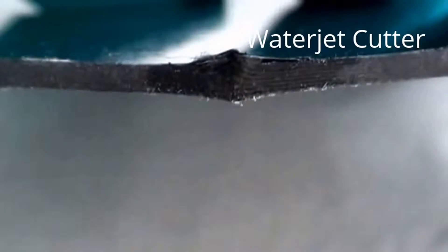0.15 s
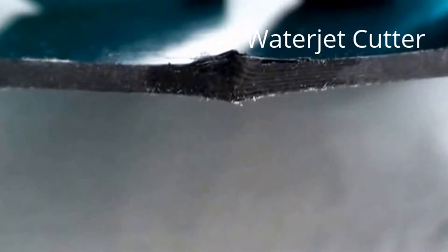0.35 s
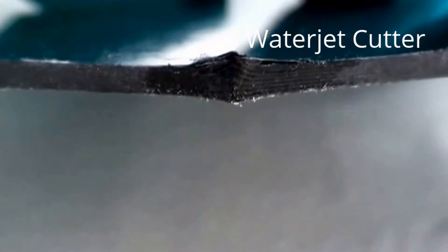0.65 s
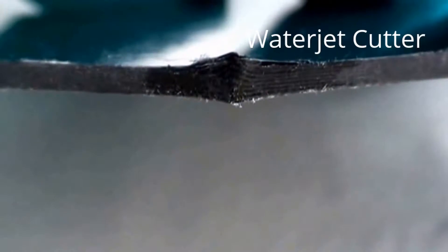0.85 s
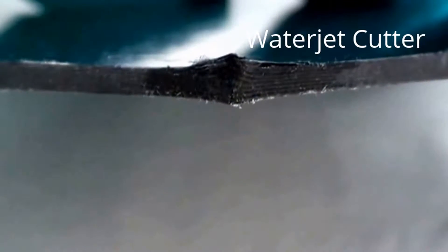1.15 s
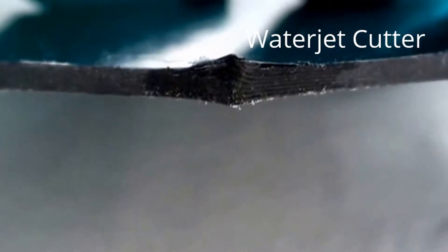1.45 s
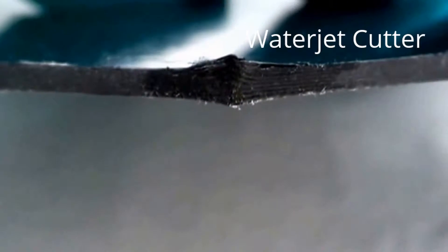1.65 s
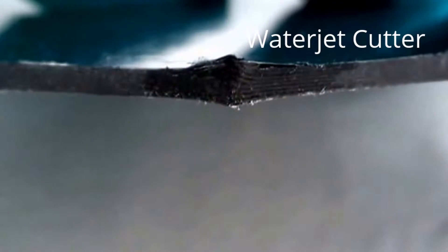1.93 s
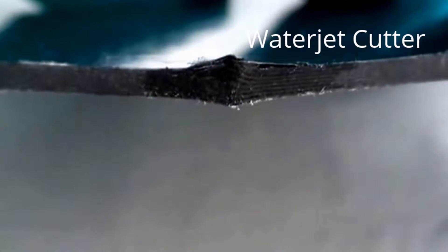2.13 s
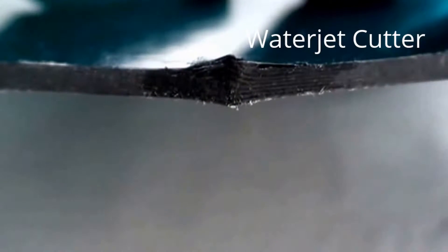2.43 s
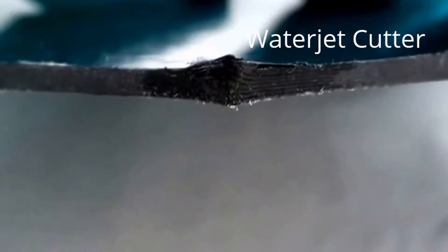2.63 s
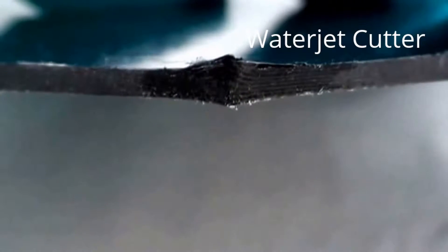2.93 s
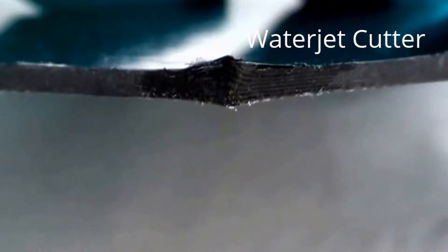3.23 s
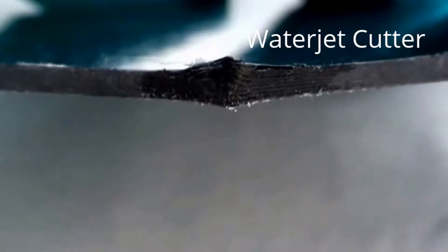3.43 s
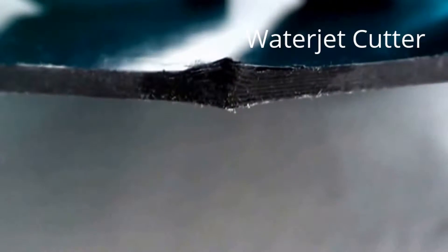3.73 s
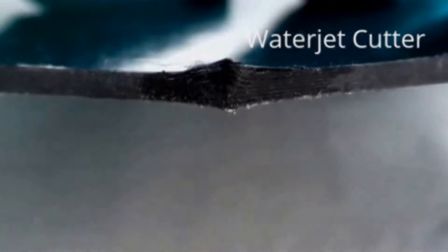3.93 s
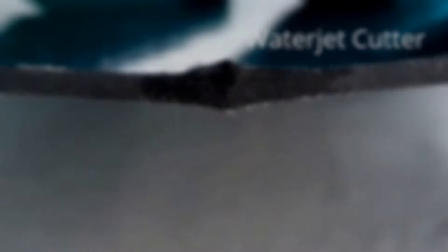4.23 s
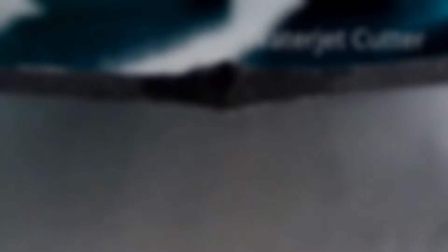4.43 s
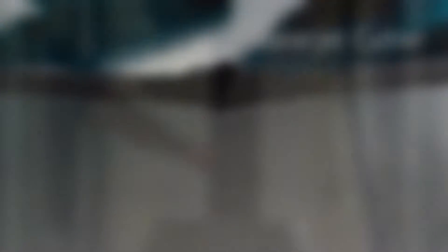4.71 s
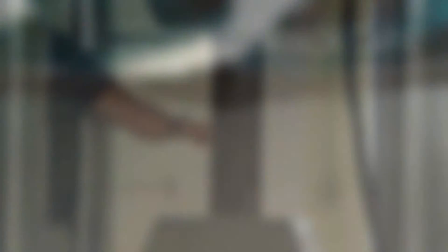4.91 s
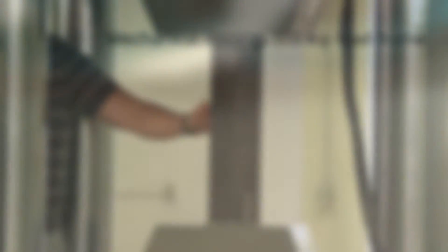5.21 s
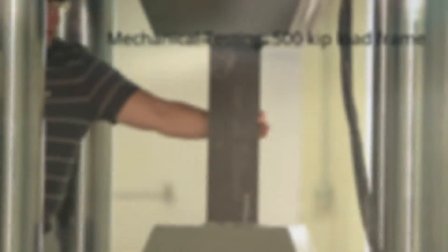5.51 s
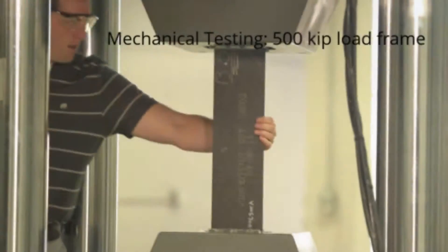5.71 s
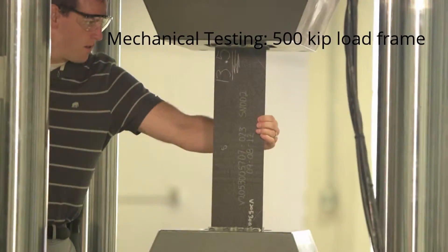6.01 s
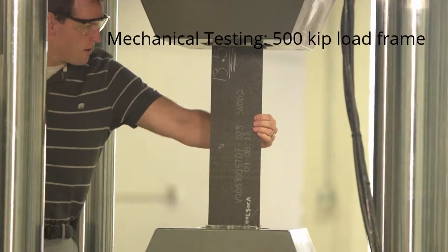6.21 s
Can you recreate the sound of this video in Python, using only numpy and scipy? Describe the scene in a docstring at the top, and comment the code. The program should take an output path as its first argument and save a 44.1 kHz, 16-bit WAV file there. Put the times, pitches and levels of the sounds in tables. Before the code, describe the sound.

A waterjet cutter hisses steadily over the low roar and droning hum of pumps and motors, then fades out.

```python
"""A waterjet cutter running in a lab, heard on a stereo pair of microphones.
For the first quarter second they stand at a spot where the room cancels the hum and lifts the mids.
From then on, at the main spot, the jet hisses in the panel and catch tank over the roar of the pump
hall, with pump strokes, mains buzz and the steady tones of a blower, fans and motors.
From about 3.8 s the sound is faded out, reaching silence just before 6 s."""
import sys
import numpy as np
from scipy import signal
from scipy.fft import rfft, irfft, next_fast_len
from scipy.io import wavfile
from scipy.ndimage import uniform_filter1d, map_coordinates

SR = 44100
rng = np.random.default_rng(int(sys.argv[2]) if len(sys.argv) > 2 else 0)


def master_out(mix):
    """Clip the mix to full scale and print it as 16-bit PCM to the path in sys.argv[1]."""
    frames = np.transpose(np.atleast_2d(mix))
    ceiling = np.clip(frames, -1, 1)
    pcm = np.round(ceiling * 32767).astype(np.int16)
    wavfile.write(sys.argv[1], SR, pcm)


N = 280476

# Diffuse sound that differs between the microphones. Each row: frequency in Hz, side minus mid in dB.
DIFFUSE_WIDTH = [(60, -29), (99, -44), (160, -34), (270, -24.5), (450, -18), (740, -13.5), (1220, -10.5),
                 (2010, -9.5), (3330, -10), (5500, -9), (9080, -14.5), (15000, -38)]
# Balance across the pair. Each row: frequency in Hz, left minus right in dB.
BALANCE = [(60, 0.0), (130, 0.0), (290, 0.0), (640, 0.0), (1410, -1.5), (3100, -1.0), (6820, -1.0),
           (15000, 0.0)]


def jet_hiss():
    """The water jet hisses as it strikes the panel and the catch tank."""
    # Each row: frequency in Hz, noise density in dB.
    spectrum = [(300, -84), (1200, -73), (1800, -67), (2200, -66.5), (2600, -69.5), (3100, -69),
                (4000, -73), (5500, -72), (6200, -72), (8500, -77.5), (10000, -84), (12000, -89),
                (14200, -91.5), (15700, -94.5)]
    return room_noise(spectrum, patchy_db=0.4, swell_db=0.5, ripple_db=1.0)


def hall_roar():
    """The machines fill the pump hall with a low, steady roar."""
    # Each row: frequency in Hz, noise density in dB.
    spectrum = [(15, -78), (31, -70), (38, -59), (47, -69), (72, -54), (140, -50), (200, -56.5), (290, -47),
                (345, -55), (580, -54.5), (730, -54.5), (800, -57), (1100, -61), (1700, -69), (4000, -90.5)]
    return room_noise(spectrum, patchy_db=0.5, swell_db=-0.2, ripple_db=0.5)


def blower_drone():
    """The turning blower gives the loudest drone in the room."""
    # Each row: multiple of the rotation rate, level in dB.
    orders = [(4, -37.5), (5, -28.0), (10, -39.0)]
    return tones(orders, base_hz=59.61, slip_hz=0.04)


def mains_buzz():
    """Iron cores vibrate at twice the supply frequency, with a long series of harmonics."""
    # The strongest lines. Each row: multiple of the hum frequency, level in dB.
    strong = [(1, -29.3), (3, -42.2), (6, -41.9), (9, -48.7), (10, -45.4), (11, -46.8), (12, -48.1),
              (15, -40.2), (16, -48.4), (17, -42.0), (24, -51.5), (32, -52.0), (35, -52.2), (39, -49.7),
              (43, -53.1)]
    taken = [k for k, _ in strong]
    # Faint, uneven harmonics fill the upper gaps, falling with pitch.
    uneven_db = 2.5 * rng.standard_normal(56)
    faint = [(k, -58 - 0.12 * k + uneven_db[k]) for k in range(18, 56) if k not in taken]
    return tones(list(strong) + faint, base_hz=119.96, slip_hz=0.003, waver_db=0.6)


def pump_strokes():
    """The pump's strokes repeat fast enough to merge into a pitched drone."""
    # Each row: multiple of the stroke rate, level in dB.
    orders = [(1, -39.8), (3, -34.7), (4, -42.1), (8, -35.8), (10, -41.9)]
    return tones(orders, base_hz=90.88, slip_hz=0.03, waver_db=0.8)


def shaft_hum():
    """Another rotating machine hums at multiples of its shaft speed."""
    # Each row: multiple of the rotation rate, level in dB.
    orders = [(2, -42.3), (3, -39.5), (9, -45.4), (11, -49.3), (12, -44.7)]
    return tones(orders, base_hz=71.72, slip_hz=0.03)


def fans_and_motors():
    """Other fans and motors around the room each hold a tone of their own."""
    # Each row: frequency in Hz, level in dB.
    lines = [(50.6, -47.7), (77.9, -45.1), (220.7, -39.5), (227.8, -35.0), (232.0, -38.3), (538.8, -43.0),
             (732.6, -40.6), (816.2, -46.1), (872.9, -49.5), (1633.7, -52.4), (3025.9, -55.4)]
    return tones(lines, base_hz=1, slip_hz=0.2, tied=False)


def electronic_whine():
    """Switching electronics add a thin whine, far in the background."""
    # Each row: multiple of the switching frequency, level in dB.
    harmonics = [(1, -61.9), (2, -63.1)]
    return tones(harmonics, base_hz=6002.3, slip_hz=0.15)


def first_spot(sound):
    """Room resonances at the first microphone position: a null at the hum, stronger mids."""
    # Each row: frequency in Hz, gain in dB.
    colour = [(30, 0), (100, 2), (120, -14), (138, 4), (275, 2), (298, -3), (330, 1), (480, 4), (600, 4.5),
              (730, 4), (1500, 2), (1800, 0), (4600, 3.5), (15000, 2)]
    size = next_fast_len(N)
    gain = amp(curve_at(colour, np.fft.rfftfreq(size, 1 / SR)))
    return irfft(rfft(sound, size) * gain, size)[:, :N]


def room_noise(spectrum, patchy_db, swell_db, ripple_db):
    """Noise at two microphones, with drifting patches, a slow swell and the room's standing waves."""
    # Resonances and nulls. Each row: centre in Hz, width in Hz, gain in dB.
    resonances = [(86, 7.4, -10), (122, 5.9, -7), (182, 22, 5.5), (211, 10, 1), (349, 12, 1.5),
                  (556, 22, 4), (580, 14, 1), (780, 40, -2.5), (865, 14, -1), (2250, 150, 3),
                  (4600, 370, 3.5), (4845, 100, -6), (5500, 150, -3.5), (6130, 400, 0), (8500, 410, 2)]
    size = 8192
    framing = dict(nperseg=size, noverlap=3 * size // 4)
    frames, hz = N // (size // 4) + 5, np.fft.rfftfreq(size, 1 / SR)
    mid_re, mid_im, side_re, side_im, patches = rng.standard_normal((frames, len(hz), 5)).T
    patches = uniform_filter1d(patches, size=64, axis=0)  # smooth over frequency, then over time
    patches = unit_rms(uniform_filter1d(patches, size=2, axis=1))
    swell = unit_rms(uniform_filter1d(rng.standard_normal(frames), size=8))
    ripple = unit_rms(uniform_filter1d(rng.standard_normal(len(hz)), size=4))  # standing peaks and dips
    mid = mid_re + 1j * mid_im
    side = (side_re + 1j * side_im) * amp(curve_at(DIFFUSE_WIDTH, hz))[:, None]
    lean = amp(curve_at(BALANCE, hz) / 2)[:, None]
    white = np.array([(mid + side) * lean, (mid - side) / lean])
    unit_density = np.sqrt(SR / 2) / signal.istft(mid, **framing)[1].std()
    resonance_db = sum(db / (1 + (2 * (hz - centre) / width) ** 2) for centre, width, db in resonances)
    colour_db = curve_at(spectrum, hz) + ripple_db * ripple + resonance_db
    coloured = white * amp(colour_db[:, None] + patchy_db * patches + swell_db * swell)
    return unit_density * signal.istft(coloured, **framing)[1][:, :N]


def tones(rows, base_hz, slip_hz, waver_db=1.2, tied=True):
    """Sines that slip in pitch and waver in level; tied lines slip together, as on one shaft."""
    t = np.arange(N) / SR
    shared_slip = np.cumsum(drift(2.47)) / SR
    hz = base_hz * np.array(rows)[:, 0]
    # Tones lean further to one microphone than noise does, and scatter where the sound is diffuse.
    scatter_db = 6.5 * amp(curve_at(DIFFUSE_WIDTH, hz)) * rng.standard_normal(len(rows))
    lean_db = (2.4 * curve_at(BALANCE, hz) + scatter_db) / 2
    waves = np.empty((len(rows), N))
    for k, (multiple, level_db) in enumerate(rows):
        slip = multiple * shared_slip if tied else np.cumsum(drift(2.5)) / SR
        turns = multiple * base_hz * t + slip_hz * slip + rng.random()
        waver = np.maximum(1 + (amp(waver_db) - 1) * drift(4.52), 0)
        waves[k] = np.sqrt(2) * amp(level_db) * waver * np.sin(2 * np.pi * turns)
    return amp([lean_db, -lean_db]) @ waves


def drift(rate_hz):
    """A slow wander of rms 1: rate_hz random knots a second, smoothly joined."""
    knots, grid = rng.standard_normal(200), np.arange(0, N + 256, 256)
    wander = map_coordinates(knots, [grid / SR * rate_hz], order=3)
    return np.interp(np.arange(N), grid, unit_rms(wander))


def curve_at(points, hz):
    """Interpolates a curve on a log-frequency axis."""
    point_hz, value = np.transpose(points)
    return np.interp(np.log(hz + 1), np.log(point_hz + 1), value)


def amp(db):
    """Turns dB into gain."""
    return 10 ** (np.asarray(db) / 20)


def unit_rms(x):
    """Scales to rms 1."""
    return x / np.sqrt(np.mean(x ** 2))


def scene():
    """All machines run together, heard briefly from the first spot and then from the main one."""
    hall = hall_roar() + jet_hiss() + mains_buzz() + pump_strokes()
    hall += shaft_hum() + blower_drone() + electronic_whine() + fans_and_motors()
    move_s, crossfade_s = 0.25, 0.01
    moved = np.clip((np.arange(N) / SR - move_s) / crossfade_s, 0, 1)
    return first_spot(hall) * (1 - moved) + hall * moved


def record(dry):
    """The fader closes along a raised cosine, and a steep low-pass takes off the highest treble."""
    fade_start_s, fade_end_s, cutoff_hz = 3.815, 5.85, 15740
    progress = np.clip((np.arange(N) / SR - fade_start_s) / (fade_end_s - fade_start_s), 0, 1)
    fader = ((1 + np.cos(np.pi * progress)) / 2) ** 0.97
    lowpass = signal.firwin(3071, cutoff_hz, window=("kaiser", 9), fs=SR)
    return signal.oaconvolve(dry * fader, lowpass[None], "same")


dry = scene()
out = record(dry)
master_out(out)
```